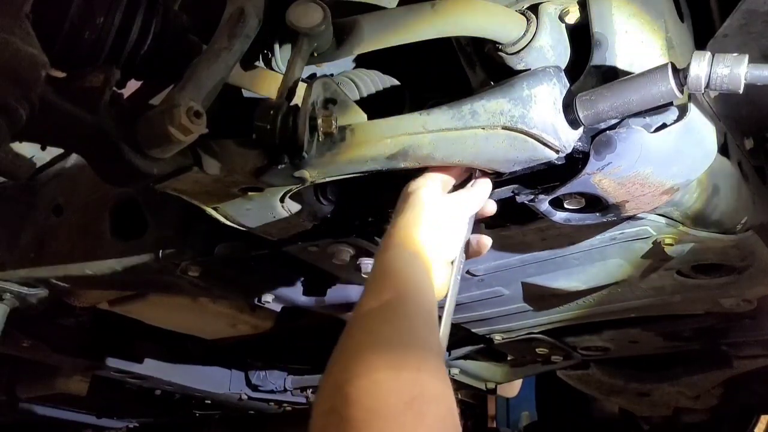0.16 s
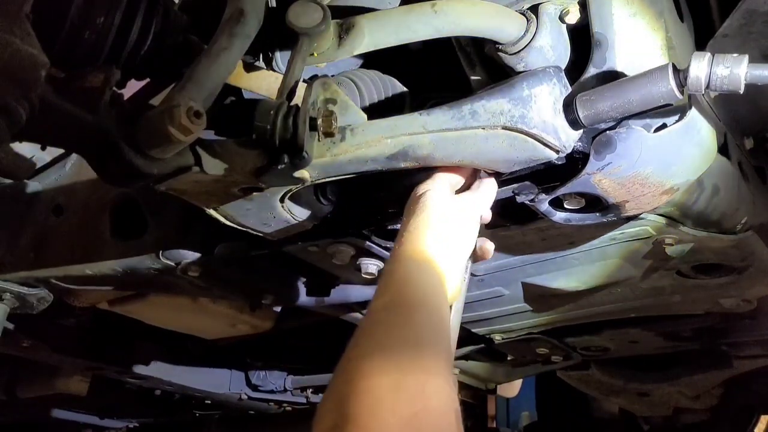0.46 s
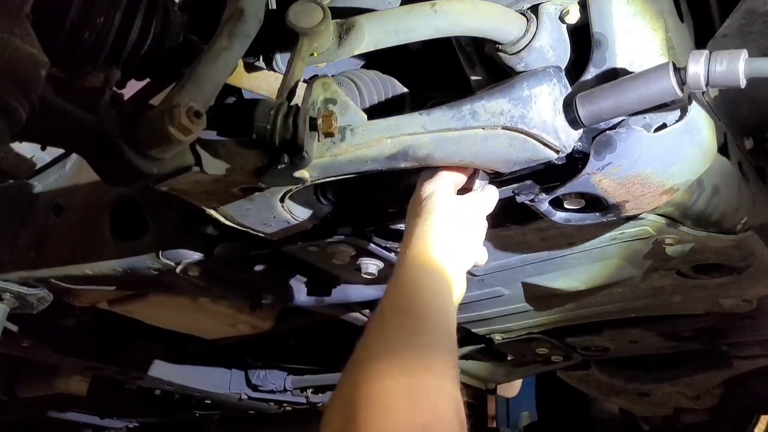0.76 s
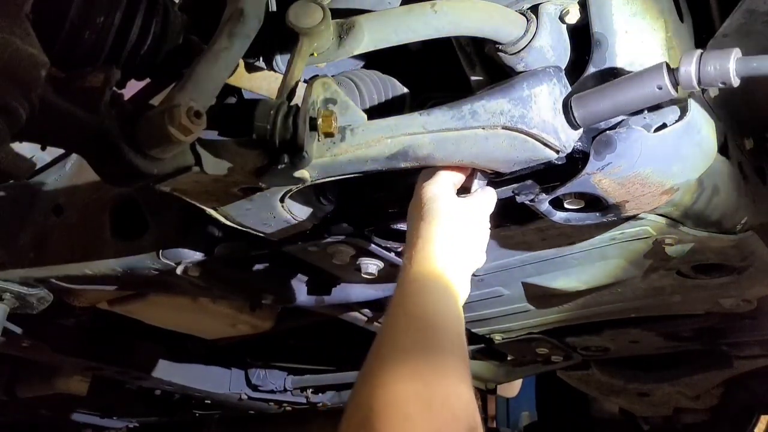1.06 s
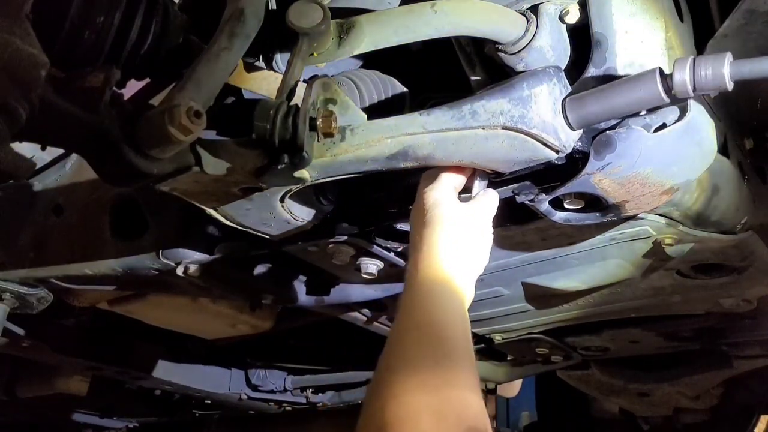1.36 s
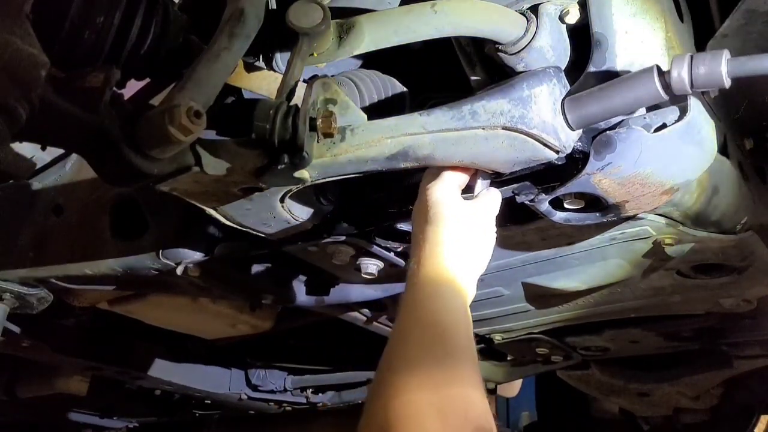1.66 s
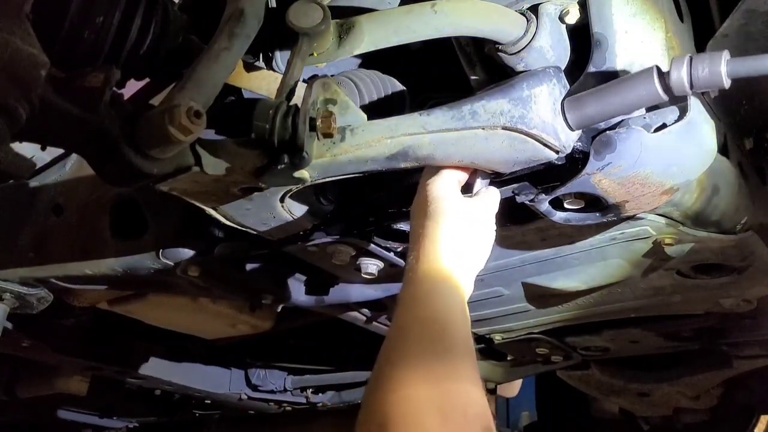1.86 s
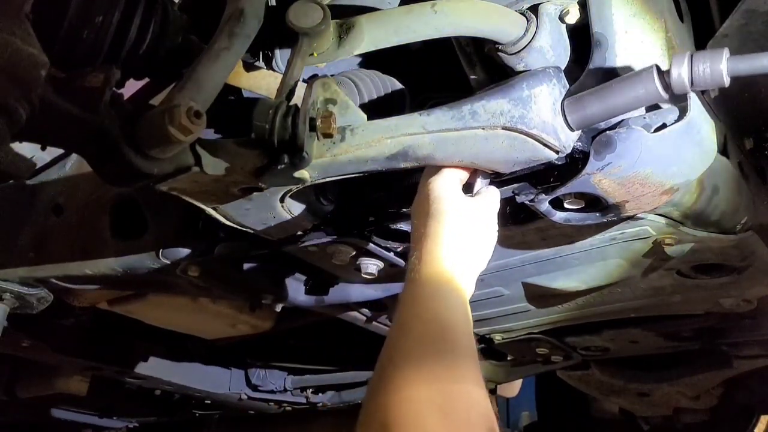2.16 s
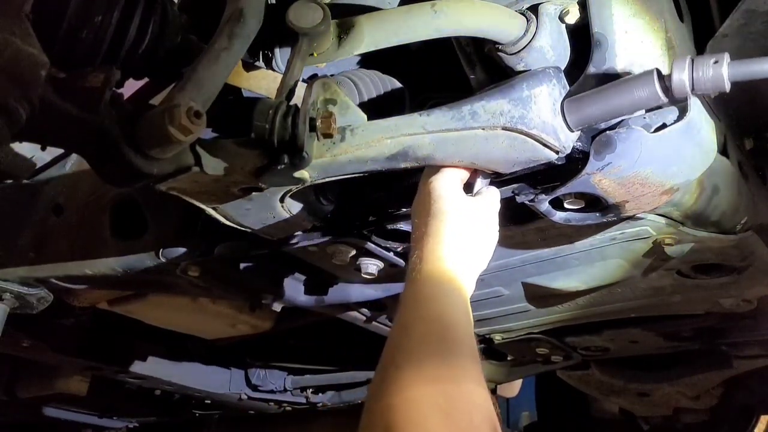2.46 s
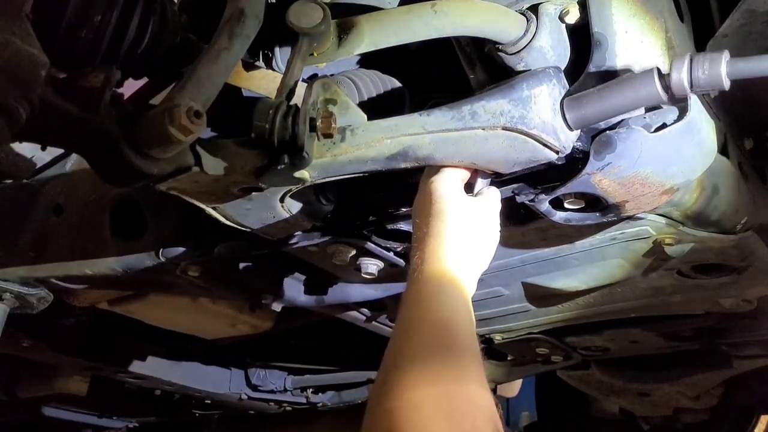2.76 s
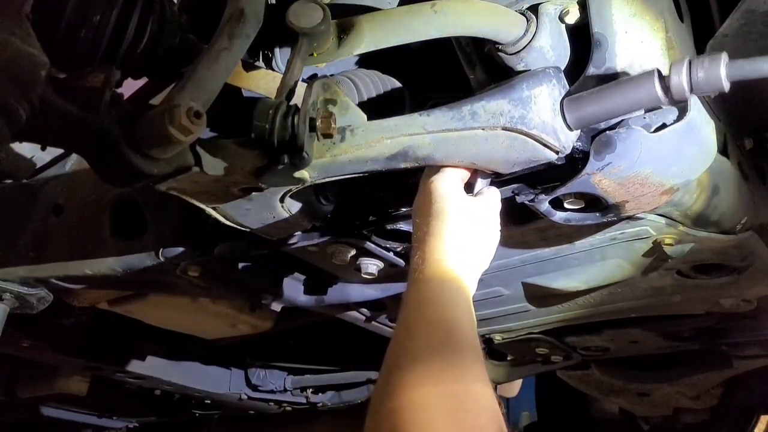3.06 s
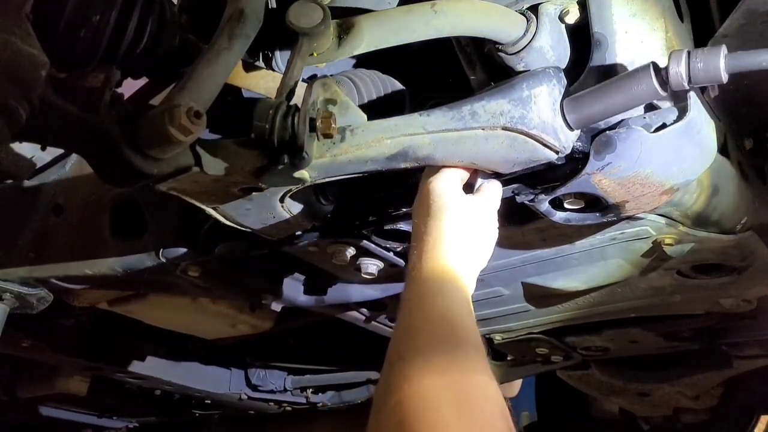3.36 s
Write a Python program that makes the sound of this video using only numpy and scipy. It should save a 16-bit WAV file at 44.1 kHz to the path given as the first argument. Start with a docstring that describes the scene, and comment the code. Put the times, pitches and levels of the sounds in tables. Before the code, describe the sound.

After light spanner clinks, a pneumatic impact wrench hammers a bolt tight in a garage.

```python
"""First a spanner clinks onto a nut; then an air impact wrench drives a bolt under a raised car.
A touch of the trigger gives one knock. More knocks follow and speed up into a rattle as the hammer
inside the wrench strikes the socket and shakes the car's panels. When the bolt draws tight, the steel
suspension arm rings along. Exhaust air hisses and buffets the microphone, and the garage echoes."""
import sys
import numpy as np
from scipy import signal
from scipy.fft import rfft, irfft, next_fast_len
from scipy.io import wavfile

SR = 44100
rng = np.random.default_rng(int(sys.argv[2]) if len(sys.argv) > 2 else 0)


def wav_out(sig):
    """Save sig, one row per channel (or a flat mono array), as 16-bit PCM at SR to the path in sys.argv[1]."""
    wavfile.write(sys.argv[1], SR, np.round(np.clip(np.atleast_2d(sig).T, -1, 1) * 32767).astype(np.int16))


N = 154350
TIME = np.arange(N) / SR

# speed of the hammer: t/s, rate/(blows per s)
HAMMER_RATE = [(1.68, 33.27), (1.69, 33.75), (1.84, 33.94), (1.94, 37.46), (2.18, 36.28), (2.28, 37.9),
               (2.45, 37.82), (2.72, 39.09), (3.05, 37.3), (3.28, 35.6)]
# strength of the rattling blows: t/s, crack/dB, body/dB
BLOW_FORCE = [(1.7, 2, 0.5), (2.1, 1, 0), (2.6, 1, 0.5), (2.75, 2, 0.5), (3.27, 1.5, 0)]
# single knocks as the hammer takes up slack or coasts: t/s, crack/dB, body/dB
SINGLE_KNOCKS = [(0.7185, 1.5, -10), (0.73, -9.5, -15.5), (0.9927, 1, -16), (0.9992, 0.5, -16),
                 (1.0383, 1, -2.5), (1.0794, 2.5, -3), (1.1226, 3.5, -7), (1.166, 1, -4), (1.21, 3, -1),
                 (1.2502, 0, -10), (1.293, 2.5, -1.5), (1.3342, 3.5, -3.5), (1.3781, 2.5, -4),
                 (1.4185, 2.5, -3), (1.4624, 2.5, 1), (1.5004, 4, -2), (1.546, 2, 0), (1.582, 3.5, -1),
                 (1.6164, 3.5, -0.5), (1.65, 0.5, -1), (3.28, -9, -18), (3.307, -4, -16)]
def blows():
    """The hammer knocks, then hits once a turn. Gives pulses for each blow's sharp crack and deep body."""
    first_s, last_s, jitter_s, scatter_db = 1.6805, 3.285, .00012, 1.1
    turns = np.cumsum(curve(HAMMER_RATE, TIME) * (TIME >= first_s) * (TIME < last_s)) / SR
    at = np.interp(np.arange(int(turns[-1]) + 1) + 1e-4, turns, TIME)
    slip, hard, heavy = rng.standard_normal((len(at), 3)).T
    at = at + jitter_s * slip
    crack = strikes(at, curve(BLOW_FORCE, at) + scatter_db * hard)
    body = strikes(at, curve(BLOW_FORCE, at, axis=2) + scatter_db * heavy)
    knock_s, crack_db, body_db = np.transpose(SINGLE_KNOCKS)
    loose = knock_s < 1.4  # early knocks bounce once
    bounces = strikes(knock_s[loose] + 0.011, body_db[loose] - 2)
    return crack + strikes(knock_s, crack_db), body + strikes(knock_s, body_db) + bounces


# the socket settles on the bolt head: t/s, level/dB
SETTLING_TICKS = [(0.572, -42)]
# tone of the crack: f/Hz, level/dB
CRACK_TONE = [(300, -43.5), (1500, -6.5), (3000, -8), (4500, -10.5), (6300, -11.5), (8000, -2.5),
              (10000, -5.5), (13000, -1), (16000, -2)]
def socket(pulses):
    """Steel hits steel: a hard snap, a bright crack and a short sizzle."""
    t = TIME[:SR // 8]
    rise_s, gain = 0.0015, amp(-7)
    sizzle = amp(-4) * burst(t, rise_s, 0.01)
    snap = amp(-6) * np.exp(-((t - rise_s) / 0.00031) ** 2)
    shape = burst(t, rise_s, 0.0021) + sizzle + snap
    pulses = pulses + strikes(*np.transpose(SETTLING_TICKS)) / gain
    crack = colour(repeated(pulses, shape, alike=0.44) * grain(), CRACK_TONE)
    return garage(gain * pan(1.1) * crack, echo_db=-11)


# tone of the hammer's case: f/Hz, level/dB
CASE_TONE = [(400, -23.5), (900, -13.5), (1300, -3.5), (1600, -8), (2700, -3), (4000, -4.5), (5000, -15),
             (9000, -32.5)]
def hammer(pulses):
    """The hammer's case gives each blow a short clack."""
    shape = burst(TIME[:SR // 16], 0.00052, 0.0098)
    clack = colour(repeated(pulses, shape, alike=0.67), CASE_TONE)
    return garage(amp(-10.5) * pan(-2.1) * clack, echo_db=-4.5)


def underbody(pulses):
    """Blows shake the car's underside; once the bolt is tight, the clamped steel rings too."""
    seat_s, firm_s, tighten_db_per_s = 2.66, 2.97, 5
    seated = np.clip((TIME - seat_s) / 0.044 + .5, 0, 1)  # 0 = loose, 1 = tight
    clamped = seated * amp(tighten_db_per_s * np.minimum(TIME - firm_s, 0))
    loose, tight = panels(pulses * (1 - seated), pulses * clamped)
    turning = bolt(pulses)
    # each blow is a short chatter, partly the same every time
    contact = np.exp(-TIME[:SR // 20] / 0.0029)
    chatter = 0.5 * pulses + through(pulses, contact / np.linalg.norm(contact)) * noise()
    shaking = amp(-3.5) * (loose + turning) + chassis(chatter)
    ringing = amp(-3.5) * tight + steel(pulses, chatter, clamped)
    return pan(-1.3) * (garage(shaking, echo_db=-1.5) + garage(ringing, echo_db=-2))


# tone of the panels, bolt loose: f/Hz, level/dB
LOOSE_TONE = [(40, -34), (110, -7.5), (145, -16), (190, -3), (300, -7), (420, -1.5), (650, -0.5),
              (900, -4.5), (1300, -7), (1550, -16.5), (2600, -9), (3900, -16.5), (5000, -13.5), (9000, -26)]
# tone of the panels, bolt tight: f/Hz, level/dB
TIGHT_TONE = [(40, -20), (105, -3.5), (135, 1), (190, -1), (280, 3.5), (420, 1.5), (560, 2), (850, -3.5),
              (1300, -2.5), (1550, -8), (1800, -6), (3100, -3.5), (3800, -10.5), (4500, -5.5),
              (6000, -10.5), (9000, -14)]
def panels(loose_pulses, tight_pulses):
    """The panels thud at each blow, brighter when the bolt is tight."""
    thud = burst(TIME[:SR // 8], 0.0018, 0.0079)
    return (colour(repeated(loose_pulses, thud, alike=0.58), LOOSE_TONE),
            colour(repeated(tight_pulses, thud, alike=0.58), TIGHT_TONE))


# note of the turning bolt: t/s, f/Hz, level/dB
BOLT_NOTE = [(1.0, 1030, -26), (1.65, 1240, 1), (1.9, 1210, 3), (2.15, 1200, 4), (2.42, 1350, 6.5),
             (2.62, 1235, 7.5), (2.8, 1230, -15)]
def bolt(pulses):
    """Each blow rings the bolt briefly, at a pitch that drifts as it turns."""
    width_hz = 120
    decay = np.exp(-np.pi * width_hz / SR)
    drive = through(pulses, burst(TIME[:SR // 8], 0.0018, 0.0055)) * noise()
    return 2 * (1 - decay) * resonate(drive, BOLT_NOTE, decay) * amp(curve(BOLT_NOTE, TIME, axis=2))


# how firmly the bolt grips the car's frame: t/s, level/dB
BOLT_GRIP = [(.72, -5.5), (1.0, 0), (1.15, 2.5), (1.4, 3), (1.8, 0), (2.05, -3), (2.22, -3), (2.6, -3.5),
             (2.8, -7.5), (3.3, 1)]
# notes of the frame: f/Hz, level/dB, ring time/s
FRAME_NOTES = [(183.7, -35, 0.15), (197.3, -36, 0.15), (233, -37, 0.59), (307.3, -37, 0.43),
               (334.4, -38.5, 0.29), (476.6, -42.5, 0.82), (573.5, -41, 0.42), (673.5, -44, 0.43),
               (742, -50, 0.89), (1036, -44.5, 0.35), (1182, -49, 0.24), (1836, -38, 0.065),
               (2640, -37, 0.071), (3020, -34, 0.067)]
# boom of the underside, rising with the load: t/s, f/Hz, level/dB
RISING_BOOM = [(1.1, 205, -39), (1.38, 222, -25), (1.55, 238, -37), (1.72, 306, -33), (1.88, 333, -29.5),
               (2.2, 335, -37), (2.35, 333, -46)]
def chassis(chatter):
    """Blows pass through the bolt into the car's frame, which rings and booms."""
    notes = through(chatter * amp(curve(BOLT_GRIP, TIME)), ring(FRAME_NOTES))
    return notes + gliding(chatter, RISING_BOOM, ring_s=.12)


# notes of the clamped arm: f/Hz, level/dB, ring time/s
ARM_NOTES = [(362, -38.5, 0.15), (476, -33, 0.31), (1195, -38.5, 0.077), (2643, -29, 0.08),
             (7730, -33, 0.034), (10770, -41, .06)]
# hum of the arm, sinking as the hammer slows: t/s, f/Hz, level/dB
ARM_GLIDE = [(2.35, 563, -55), (2.48, 569, -28), (2.65, 583, -38), (2.8, 580, -28), (3.0, 567, -37.5),
             (3.2, 546.5, -30), (3.3, 545, -30)]
# ring of the socket: t/s, f/Hz, level/dB
SOCKET_GLIDE = [(2.55, 3100, -45), (2.65, 3060, -21), (2.75, 3040, -17.5), (2.92, 3038, -16),
                (3.051, 2980, -31.5), (3.16, 3020, -18.5), (3.3, 2980, -40)]
# ring of the sleeve around the bolt: t/s, f/Hz, level/dB
SLEEVE_GLIDE = [(2.55, 1790, -47), (2.65, 1720, -21), (2.9, 1850, -32), (3.0, 1710, -18), (3.28, 1750, -18)]
def steel(pulses, chatter, clamped):
    """Arm, socket and sleeve ring as the bolt draws tight."""
    arm = through(chatter * clamped, ring(ARM_NOTES)) + gliding(pulses, ARM_GLIDE, ring_s=0.18)
    socket_ring = gliding(chatter, SOCKET_GLIDE, ring_s=.04)
    return arm + socket_ring + gliding(chatter, SLEEVE_GLIDE, ring_s=0.033)


# the bolt jumps in its sleeve: t/s, level/dB
BOLT_JUMPS = [(1.6147, -25), (1.6806, -7.5), (1.709, -17), (1.771, -13.5), (1.8, -15.5)]
# tone of a jump: f/Hz, level/dB
JUMP_TONE = [(300, -22), (1200, -9), (2000, -10), (2700, -9), (3300, 3.5), (4050, 2), (4500, -24),
             (7000, -20), (12000, -3), (16000, -3)]
# the first knock, thrown back by floor and car: t/s, level/dB, fade/s
FIRST_CLACK = (.731, -24.5, 0.035)
# tone of that clack: f/Hz, level/dB
DULL_TONE = [(120, -29), (190, -16), (330, -14), (500, 6.5), (850, 1), (1200, -4), (1600, -10),
             (2200, -3.5), (3800, -10), (6000, -25)]
def clanks():
    """The first knock clacks dully; later the bolt jumps hard as it takes load."""
    jumps = sum(amp(db) * burst(TIME - s, .0005, 0.0081) for s, db in BOLT_JUMPS)
    s, db, fall_s = FIRST_CLACK
    clack = amp(db) * burst(TIME - s, 0.0024, fall_s) * toned_noise(DULL_TONE)
    return garage(jumps * toned_noise(JUMP_TONE) + clack, echo_db=-10)


# air through the motor: t/s, level/dB
AIR_FLOW = [(.62, -81), (.67, -59), (.714, -42), (.724, -32), (.77, -54), (.86, -63), (.91, -41),
            (.96, -28), (1.0, -26.5), (1.1, -25.5), (1.5, -33.5), (2.6, -36.5), (3.0, -29.5), (3.3, -28),
            (3.35, -39), (3.5, -47.5)]
# tone of the exhaust: f/Hz, level/dB
EXHAUST_TONE = [(60, -32), (200, -0.5), (600, 8), (1100, 1.5), (2000, -3), (3300, 3), (4200, -10),
                (5500, -12), (9000, -7.5), (13000, -7.5), (16000, -9)]
# the trigger valve is part open: t/s, length/s, level/dB
VALVE_OPENINGS = [(0.65, 0.0097, -54), (0.678, 0.049, -44), (0.861, 0.061, -42.5), (0.911, 0.092, -36)]
# tone of its whistle: f/Hz, level/dB
WHISTLE_TONE = [(500, -26), (2600, -18), (3200, -10), (3530, -2), (3850, -12), (4400, -26), (9000, -40)]
def air():
    """Air whistles through the part-open valve and hisses out of the exhaust."""
    hiss = amp(curve(AIR_FLOW, TIME)) * toned_noise(EXHAUST_TONE)
    opening = sum(amp(db) * np.clip(np.minimum(TIME - s, s + length - TIME) / 0.019 + .5, 0, 1)
                  for s, length, db in VALVE_OPENINGS)
    return garage(hiss + opening * toned_noise(WHISTLE_TONE), echo_db=-3.5)


# draught on the microphone: t/s, level/dB
DRAUGHT_LEVEL = [(.95, -66), (1.03, -57), (1.2, -46), (1.35, -37.5), (1.6, -47), (2.2, -47.5), (2.6, -44),
                 (2.9, -38), (3.3, -40.5), (3.38, -50), (3.5, -66)]
# sudden puffs: t/s, level/dB
AIR_PUFFS = [(1.379, -15), (2.687, -13), (2.735, -16)]
# tone of the rumble: f/Hz, level/dB
RUMBLE_TONE = [(12, -12), (35, 1), (70, 5), (120, -9), (250, -32), (1000, -80)]
def draught():
    """Exhaust air blows on the microphone and makes a low rumble."""
    puffs = sum(amp(db) * burst(TIME - s, 0.006, 0.0082) for s, db in AIR_PUFFS)
    return pan(0.98) * (amp(curve(DRAUGHT_LEVEL, TIME)) + puffs) * toned_noise(RUMBLE_TONE)


# spanner taps: t/s, scrape/dB, ring/dB, scrape fade/s, ping/Hz, ping/dB
TAPS = [(0.047, -46, -42, 0.018, 1065, -48), (0.082, -45, -35, 0.008, 2800, -50),
        (0.138, -43, -56, 0.01, 2340, -50), (0.147, -60, -28, 0.014, 2010, -54),
        (0.264, -48, -40, 0.0053, 1000, -56), (0.288, -48, -56, 0.02, 3010, -55),
        (0.306, -47.5, -41, 0.022, 1050, -49), (0.39, -64, -70, .01, 1300, -59)]
# notes of the spanner: f/Hz, level/dB, ring time/s
SPANNER_NOTES = [(684, -8, 0.19), (644, -7, 0.097), (556, -15, 0.14), (1060, -29, 0.097), (1290, -24, 0.13),
                 (1940, -26, 0.082), (3200, -27, 0.07), (4000, -25, .06)]
# tone of a scrape: f/Hz, level/dB
SCRAPE_TONE = [(200, -10), (600, 7.5), (1100, -1), (1700, -4), (3200, -10), (5000, -21), (9000, -24),
               (16000, -38)]
def spanner():
    """The spanner scrapes and rings on the nut; each spot it touches has its own ping."""
    scrapes = sum(amp(db) * burst(TIME - s, 0.00067, fall_s) for s, db, _, fall_s, _, _ in TAPS)
    scrapes = scrapes * grain() * toned_noise(SCRAPE_TONE)
    pings = sum(amp(db) * burst(TIME - s, 0.0005, 0.0092) * np.sin(2 * np.pi * hz * (TIME - s))
                for s, _, _, _, hz, db in TAPS)
    at, _, ring_db = np.transpose(TAPS)[:3]
    clink = ring(SPANNER_NOTES) * (1 - np.exp(-TIME[:SR // 2] / 0.004))
    return pan(-1.5) * garage(scrapes + pings + through(strikes(at, ring_db), clink), echo_db=-7.5)


# how long the garage echoes: f/Hz, ring time/s
ECHO_TIMES = [(60, 1), (200, 1), (400, 0.47), (1000, 0.31), (3000, 0.31), (7000, 0.39), (15000, 0.18)]
def garage(x, echo_db):
    """Adds the room's echo, 9 ms late; low notes last longest."""
    hz, t, bands = signal.stft(noise(size=SR), SR, nperseg=256)
    ring_s = read(ECHO_TIMES, hz)[:, None]
    tail = signal.istft(bands * amp(-60 * t / ring_s) / np.sqrt(ring_s), SR, nperseg=256)[1]
    tail = np.pad(tail / np.linalg.norm(tail[0]), ((0, 0), (round(.009 * SR), 0)))
    return x + amp(echo_db) * through(x, tail)


# tone of the quiet workshop: f/Hz, level/dB
WORKSHOP_TONE = [(25, -13), (60, -7.5), (144, -4.5), (230, -12.5), (320, -19.5), (650, -14), (1000, -20),
                 (1400, -19), (2500, -25.5), (4000, -30.5), (5000, -39), (6200, -25), (7500, -46),
                 (9200, -22), (10500, -33), (12800, -17.5), (15500, -26)]
def workshop():
    """A faint, steady hush lies behind everything."""
    return amp(-56) * toned_noise(WORKSHOP_TONE)


# how alike left and right are: f/Hz, likeness (1 = same, -1 = opposite)
STEREO_LIKENESS = [(30, 0.4), (60, 0.4), (120, 1), (240, 0.48), (480, -0.22), (950, -0.31), (1900, -0.46),
                   (3800, 0.032), (15000, -0.11)]
def noise(size=N):
    """Stereo noise: alike in the bass, partly opposite in the middle."""
    count = next_fast_len(size)
    own, right = rfft(rng.standard_normal((2, count)))
    share = np.clip(read(STEREO_LIKENESS, np.fft.rfftfreq(count, 1 / SR)), -1, 1)
    left = share * right + np.sqrt(1 - share ** 2) * own
    return irfft(np.array([left, right]), count)[:, :size]


def ring(notes):
    """Pure stereo notes, each fading by 60 dB in its ring time."""
    t = TIME[:SR // 2]
    lead = lambda hz: np.array([[np.arccos(np.clip(read(STEREO_LIKENESS, hz), -1, 1))], [0]])
    return sum(amp(db - 60 * t / ring_s) * np.sin(2 * np.pi * hz * t + lead(hz))
               for hz, db, ring_s in notes)


def resonate(drive, path, decay):
    """Rings at a moving pitch, keeping the share `decay` of its swing each sample."""
    turn = np.exp(2j * np.pi * np.cumsum(curve(path, TIME)) / SR)
    return (turn * signal.lfilter([1], [1, -decay], drive / turn + 1e-18)).real


def gliding(drive, path, ring_s):
    """A note whose pitch and strength follow a table, silent before its first row."""
    drive = drive * amp(curve(path, TIME, axis=2)) * (TIME > path[0][0])
    return resonate(drive, path, amp(-60 / (ring_s * SR)))


def repeated(pulses, shape, alike):
    """A noise burst for each blow, partly the same every time."""
    same = through(pulses, shape * noise(size=len(shape)))
    fresh = through(pulses, shape) * noise()
    return alike * same + np.sqrt(1 - alike ** 2) * fresh


def grain():
    """A fast flicker in level: the tiny contacts of steel on steel."""
    knots = np.arange(0, TIME[-1] + .01, .0007)
    flicker_db = 3 * np.clip(rng.standard_normal(N)[:len(knots)], -2, 2)
    return evened(amp(np.interp(TIME, knots, flicker_db)))


def burst(t, rise_s, fall_s):
    """A quick rise and a smooth fade from t = 0."""
    t = np.maximum(t, 0)
    return (1 - np.exp(-(t / rise_s) ** 2)) * np.exp(-t / fall_s)


def strikes(times, db):
    """One pulse for each blow."""
    return np.bincount(np.round(times * SR).astype(int), amp(db), N)[:N]


def toned_noise(tone):
    """Steady noise with the given tone."""
    return evened(colour(noise(), tone))


def colour(x, tone):
    """Filters x to the given tone, with no sound ahead of a hit."""
    log_gain = np.log(amp(read(tone, abs(np.fft.fftfreq(4096, 1 / SR)))))
    response = np.fft.ifft(np.exp(np.conj(signal.hilbert(log_gain)))).real
    return through(x, response[:len(log_gain) // 2])


def through(x, response):
    """Every sample of x sets off a copy of the response."""
    return signal.fftconvolve(np.atleast_2d(x), np.atleast_2d(response), axes=1)[:, :N]


def read(points, hz):
    """A table's value at the pitches hz."""
    f, value = np.transpose(points)
    return np.interp(np.log(hz + 1), np.log(f + 1), value)


def curve(points, t, axis=1):
    """One column of a table at the times t."""
    rows = np.array(points)
    return np.interp(t, rows[:, 0], rows[:, axis])


def evened(x):
    """Scales to an average power of 1."""
    return x / np.sqrt(np.mean(x ** 2) + 1e-20)


def pan(db):
    """Left and right gains; positive leans left."""
    return amp([[db], [-db]])


def amp(db):
    """Decibels to gain."""
    return 10 ** (np.asarray(db) / 20)


def scene():
    """Wrench, car, air and spanner over the quiet of the workshop."""
    crack, body = blows()
    hush = workshop()
    return socket(crack) + underbody(body) + hammer(body) + clanks() + air() + draught() + spanner() + hush


def record(dry):
    """Clips peaks at full scale and cuts the very highest treble."""
    lowpass = signal.firwin(511, 15950, window=("kaiser", 8), fs=SR)
    return signal.oaconvolve(np.clip(dry, -1, 1), lowpass[None], "same")


dry = scene()
out = record(dry)
wav_out(out)
```